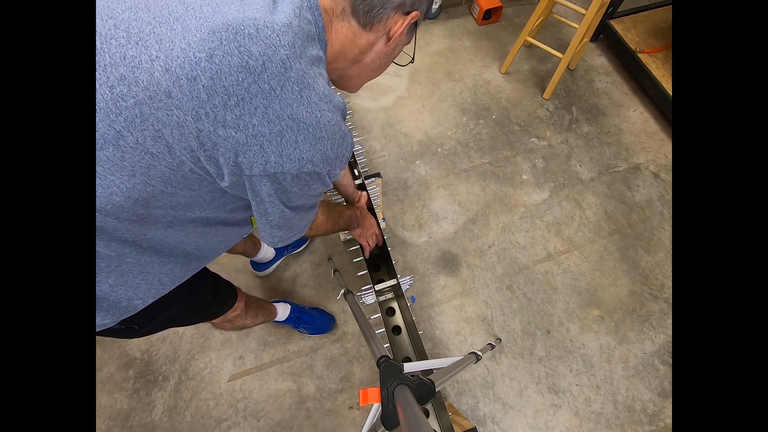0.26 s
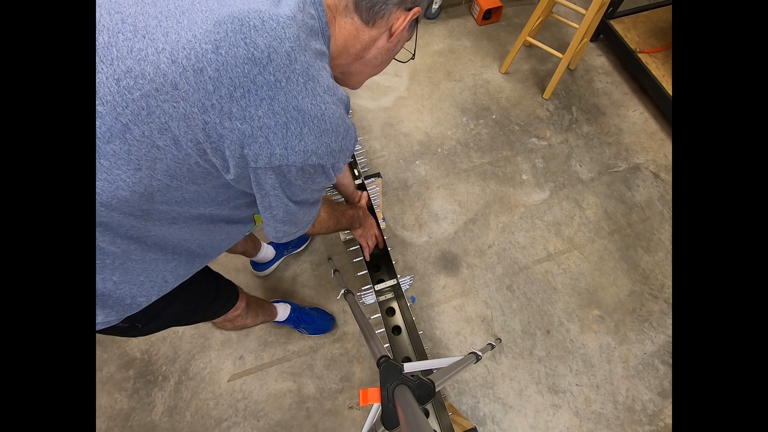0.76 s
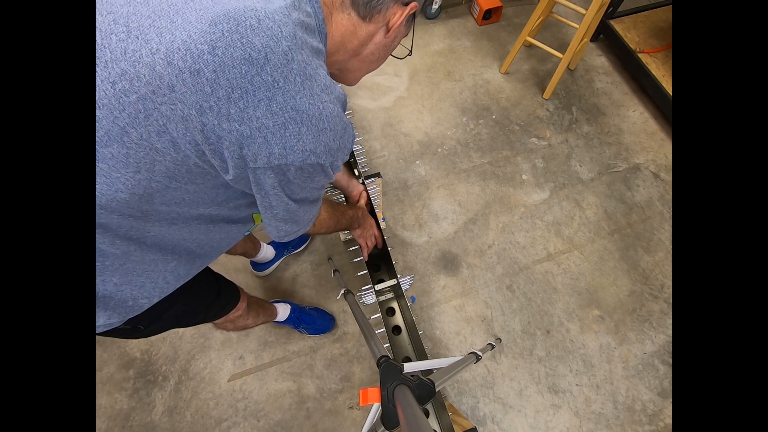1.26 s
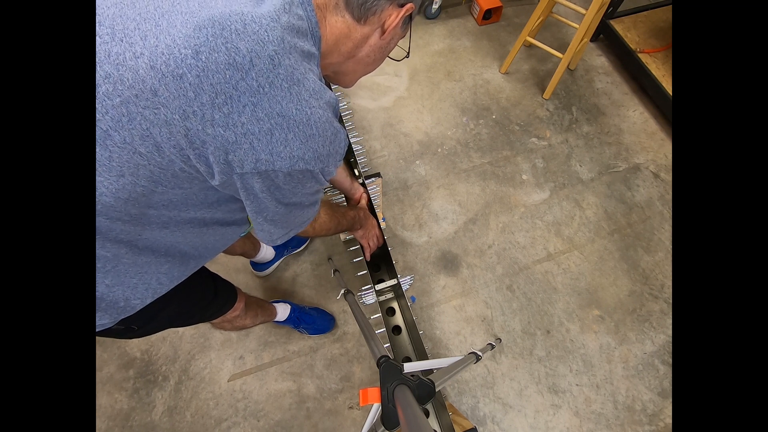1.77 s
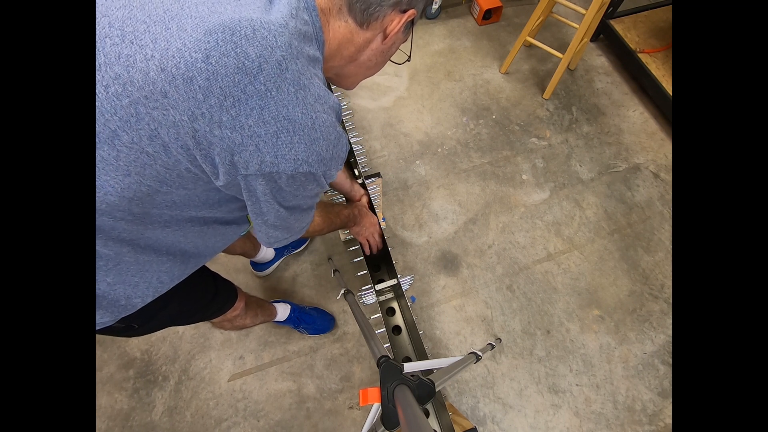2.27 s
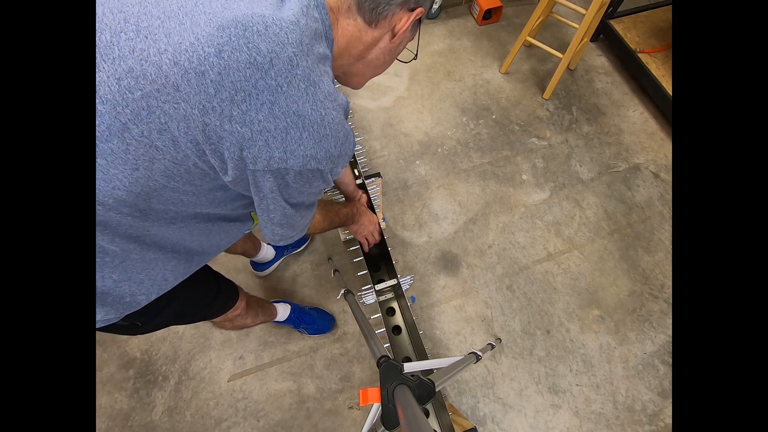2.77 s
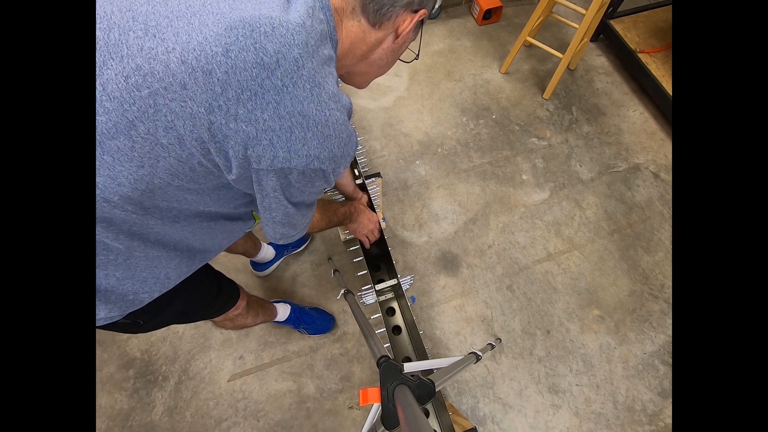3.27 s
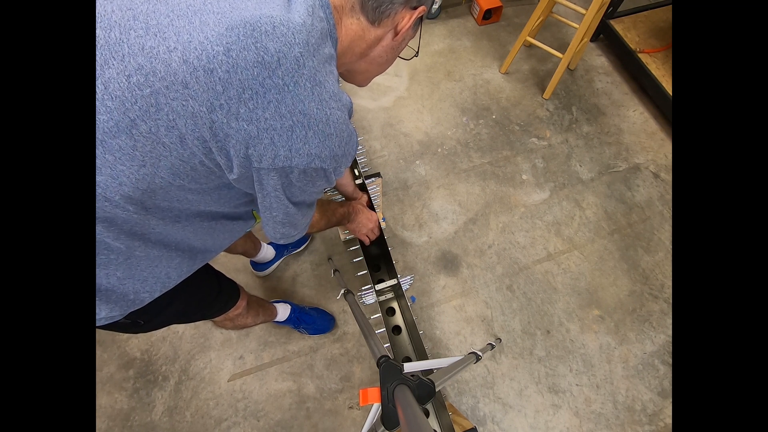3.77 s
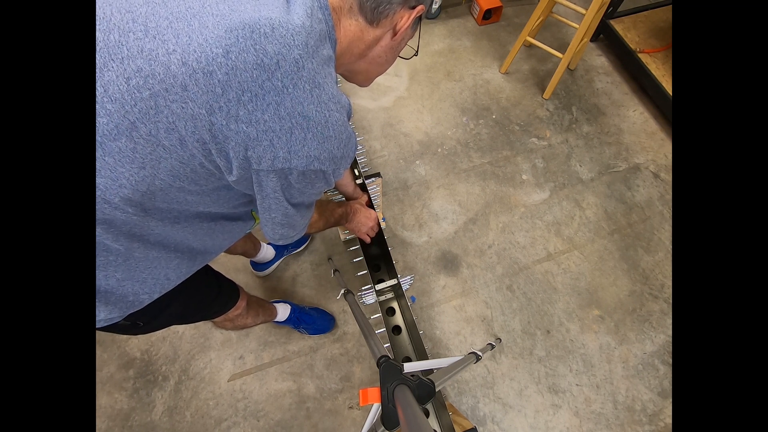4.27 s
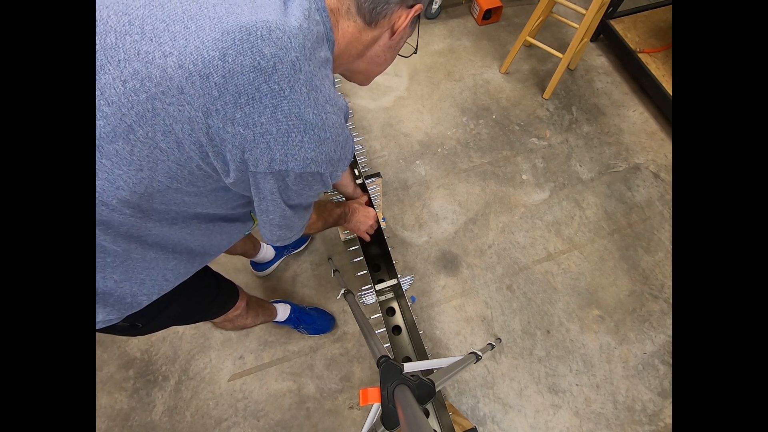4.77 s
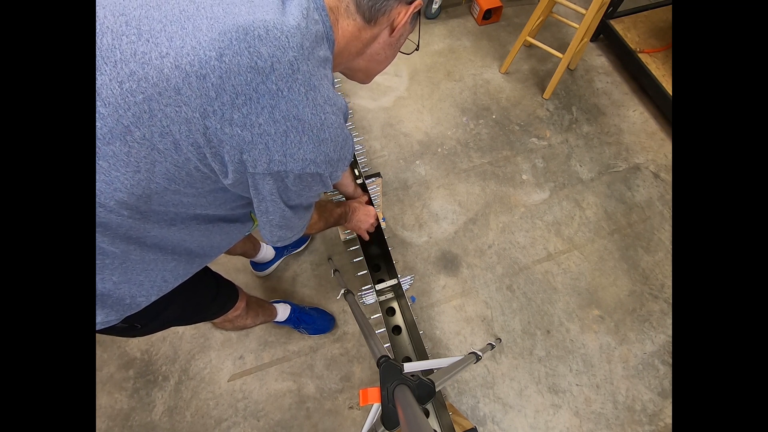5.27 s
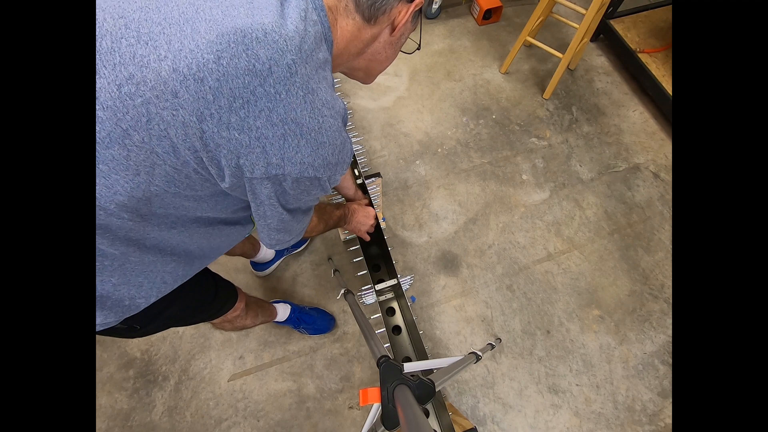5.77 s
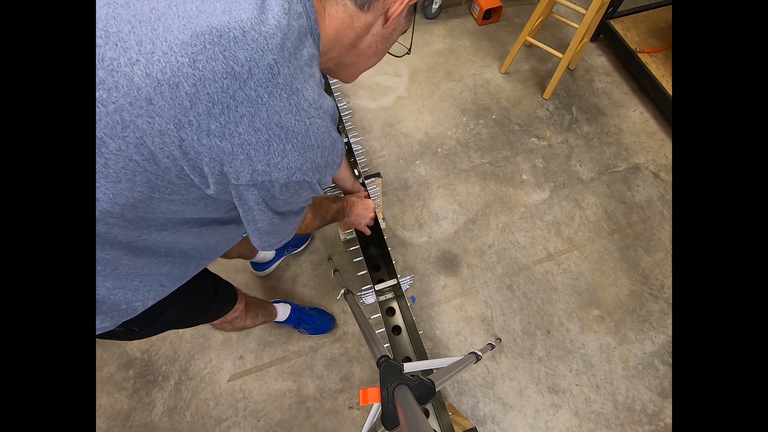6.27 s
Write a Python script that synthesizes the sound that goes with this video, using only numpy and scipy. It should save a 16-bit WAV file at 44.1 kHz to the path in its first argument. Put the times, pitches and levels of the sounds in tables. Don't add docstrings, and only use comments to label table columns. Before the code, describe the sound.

Close stereo pickup of rivets being set on a long metal beam in a reverberant concrete room. A soft fan noise runs throughout. Handles squeak before a bright crack; after a thin tick comes a softer, lower snap with a loose pin bouncing. Soft taps and sleeve rubs follow, then a very hard bang with deep rocking thuds, a tick and gentle rattling as the tool is handled again.

```python
import sys
import numpy as np
from scipy import signal
from scipy.fft import rfft, irfft, next_fast_len
from scipy.io import wavfile

SR = 44100
rng = np.random.default_rng(int(sys.argv[2]) if len(sys.argv) > 2 else 0)


def gain_from_db(level_db):
    decades = np.asarray(level_db, float) / 20
    return 10 ** decades


def wav_out(sig):
    wavfile.write(sys.argv[1], SR, np.round(np.clip(np.atleast_2d(sig).T, -1, 1) * 32767).astype(np.int16))


N = 287973
SIZE = next_fast_len(N + SR)
FREQS = np.maximum(np.fft.rfftfreq(SIZE, 1 / SR), 1)

# frequency_hz, density_db_per_hz
AIR_SPECTRUM = [(12, -45.5), (25, -24), (110, -32), (153, -10.5), (229, -14.5), (293, -32), (354, -8.5),
                (416, -17.5), (490, -16), (715, -13.5), (889, -18), (1570, -16.5), (2800, -24.5),
                (3500, -32), (6090, -36), (13000, -58)]
# frequency_hz, likeness (0 to 1)
AIR_ALIKE = [(60, 0.0978), (130, 0.28), (290, 0.74), (640, 0.096), (1410, 0.096), (3100, 0.64),
             (6820, 0.055), (15000, 0.026)]
# frequency_hz, balance_db
AIR_BALANCE = [(60, -4.5), (180, -0.5), (550, 0.5), (1650, 1.5), (4970, 2), (15000, -7.5)]
# pitch_hz, width_hz, level_db
FAN_HUM = [(238.3, 3.1, -68), (350, 11, -65.5), (471.7, 10, -81.5), (631, 11, -74.5), (735.4, 10, -73),
           (6060, 120, -91.5), (7730, 8, -103)]
AIR_DB = -60
WHINE_HZ, WHINE_DB, WHINE_WAVER_HZ = 9335, -95, 9
BELT_FIRST_S, BELT_LAP_S, BELT_S, BELT_HZ, BELT_WIDTH_HZ, BELT_DB = .25, .643, .04, 8870, 90, -92

# peak_s, level_db, build_s, ease_s
LEANS = [(0.039, -55, 0.03, .04), (.2, -64, 0.53, .15), (.6, -65, 0.22, 0.087), (1.099, -50, 0.053, 0.33),
         (1.34, -54.5, 0.13, 0.96), (1.745, -56, 0.091, 0.99), (1.98, -58.5, 0.34, 0.24),
         (2.48, -50.5, 0.17, 0.32), (2.8, -50.5, 1, 0.41), (3.07, -55, .04, 0.047), (3.2, -54, 0.18, 0.36),
         (3.351, -57, 0.068, .06), (3.48, -54.5, 0.046, 0.097), (3.76, -55, 0.05, 0.18),
         (3.93, -47.5, 0.18, 0.09), (4.311, -68, .08, 0.56), (4.66, -58, 0.039, 0.43),
         (5.3, -57.5, 0.68, 0.46), (5.42, -51.5, 0.34, 0.14), (5.53, -54.5, 0.072, .6),
         (6.05, -61.5, 0.41, 0.26), (6.232, -46.5, 0.084, 0.28), (6.45, -54.5, 0.55, 0.66)]
# start_s, length_s, level_db, swell_db_per_s
STROKES = [(1.044, 0.15, -64.5, 3), (1.214, 0.075, -68.5, -1), (1.3, .07, -63, 20), (1.87, .012, -67.5, -1),
           (2.202, 0.027, -71.5, 0), (2.247, 0.36, -72.5, 14), (2.78, 0.031, -70, 0),
           (3.07, 0.044, -79.5, -4.5), (3.74, 0.034, -82, -1.5), (3.856, .12, -77, -2),
           (5.5, 0.055, -75, 38), (5.554, .015, -57.5, 0), (5.93, .2, -76, 0), (6.01, .015, -73.5, 0),
           (6.156, 0.47, -64, 12.5)]
# frequency_hz, density_db_per_hz
FLEX_SPECTRUM = [(53, -74), (90, -44), (144, -10.5), (347, -3), (439, -10.5), (498, -9), (676, -16.5),
                 (1670, -22), (2500, -34.5), (3250, -55), (5500, -120)]
# frequency_hz, density_db_per_hz
RUB_SPECTRUM = [(900, -28.5), (1500, -6), (2750, 1.5), (4200, -3.5), (6000, -5.5), (9000, -11.5),
                (10800, -25.5), (12500, -48)]
# frequency_hz, density_db_per_hz
BRISK_RUB_SPECTRUM = [(5000, -33.5), (9000, 5), (11500, -10.5), (14000, -17), (15500, -39)]
SWING_DB, REST_FLEX_DB, REST_RUB_DB = 26.5, -69, -86.5
STROKE_RISE_DB_PER_S, STROKE_FALL_DB_PER_S = 400, 224

# pitch_hz, level_db, t60_s
PIN_MODES = [(4355, -2, .25), (4420, -1, .025), (6640, 1, .035), (7200, -14, .03)]
# start_s, level_db, hardness_db_per_octave
TINKLES = [
    (.715, -69, -25),
    (2.630, -42, -1),
    (2.644, -77, -10),
    (2.738, -78, -27),
    (2.764, -63.5, -9),
    (2.774, -57.5, 1),
    (2.782, -62, -4),
    (2.797, -64, -20),
]
PIN_RESTS = [
    .76,
    2.675,
    2.85,
]
PIN_CHOKE_DB_PER_S = 900

# frequency_hz, likeness (0 to 1)
ROOM_ALIKE = [(60, 0.92), (130, 0.99), (380, 0.99), (640, 0.3), (1410, 0.36), (3100, 0.64), (6820, 0.19),
              (15000, 0.16)]
# frequency_hz, t60_s
ROOM_T60 = [(60, 0.32), (160, 0.495), (420, 0.6), (1100, 0.44), (2910, 0.35), (7680, 0.3)]
ROOM_DB, ROOM_RISE_S = -21.5, 0.00096
BEAM_ROOM_DB = -16.5

# start_s, pitch_hz, level_db, t60_s
SQUEAKS = [(1.052, 4250, -65, 0.093), (1.085, 800, -51, .08), (1.097, 8650, -78, .1),
           (1.113, 4250, -68.5, .06), (1.126, 8620, -73, .3), (1.135, 7500, -76.5, .1),
           (1.14, 4180, -71, .2), (1.183, 4180, -69.5, .08), (1.2, 3100, -68, .06), (1.2, 6060, -76, .2),
           (1.09, 300, -46, .1)]
# start_s, pitch_hz, level_db, t60_s
BEAM_MODES = [(1.357, 4230, -26, 0.066), (1.356, 3040, -23.5, 0.08), (1.3553, 5100, -24, 0.044),
              (1.3554, 8400, -32.5, .012), (1.358, 1230, -33.5, 0.24), (1.371, 165, -30.5, 0.29),
              (1.375, 305, -21, 0.025), (1.879, 7150, -68, 0.033), (1.879, 6050, -71, 0.09),
              (1.9, 5990, -77, 0.2), (2.542, 822, -31.5, 0.11), (2.545, 1730, -32, 0.14),
              (2.544, 2730, -33.5, 0.036), (2.544, 3046, -35, 0.086), (2.545, 3280, -45, 0.096),
              (2.546, 335, -33, 0.2), (2.548, 350, -27.5, 0.055), (2.553, 6040, -34, .02),
              (2.4, 151, -55, 0.22), (2.69, 149, -48.5, 0.22), (2.801, 185, -51, .2),
              (2.921, 190, -55, 0.22), (3.9, 325.5, -46.5, 1), (3.855, 320, -40, .12), (3.91, 307, -51, .2),
              (3.938, 480, -44, 0.058), (5.5415, 820, -40, 0.074), (5.542, 8300, -49.5, .004),
              (5.5424, 10300, -54.5, 0.0065), (5.5526, 709, -26, 0.1), (5.5526, 950, -34, 0.055),
              (5.5527, 7940, -42.5, .004), (5.5545, 9900, -45, .008), (5.5637, 8500, -15, .003),
              (5.5643, 9800, -27, .004), (5.5635, 800, -4.5, 0.02), (5.565, 530, -6.5, 0.028),
              (5.565, 812, -22, 0.087), (5.564, 1500, -17.5, 0.023), (5.570, 342, -12.5, 0.14),
              (5.569, 206, -12.5, 0.083), (5.576, 178, -17, .05), (5.579, 132.6, -26.5, 0.34),
              (5.589, 146.5, -28, .28), (5.572, 166, -32, 0.26),
              (5.83, 164, -44, 0.13), (6.01, 124, -48, .1), (6.04, 188, -49.5, .15), (6.09, 137, -54.5, 0.13),
            (6.135, 180, -51, .12), (6.179, 1300, -61.5, 0.089), (6.177, 809, -49.5, 0.33),
            (6.34, 170, -48, 0.087), (6.18, 520, -56, .06), (6.26, 1250, -55, .08), (5.74, 575, -30, 0.095),
            (6.212, 164, -37, 0.12), (6.222, 213, -36, 0.11), (6.244, 225, -38.5, .1),
            (6.225, 1000, -61, .1), (6.39, 335, -43.5, 0.2), (6.401, 6300, -63, .15)]

# start_s, level_db,
# hardness_db_per_octave, part_hz, part_db
KNOCKS = [(1.08, -46, 4.5, 770, 7), (1.365, -20, 7, 3300, -0.5), (1.746, -62, 14, 6000, -2.5),
          (2.551, -23, 2.5, 5800, 11), (2.838, -46, 3, 1500, 1.5), (3.346, -48, -1, 350, 13),
          (3.453, -47, 0, 880, 1.5), (3.736, -58.5, 7.5, 8000, 5.5), (3.853, -42, -1, 883, 1),
          (3.909, -42, -1.5, 513, 7), (3.94, -51, -2.5, 500, -3), (5.54, -36.5, 1, 794, 15.5),
          (5.5527, -38, 12, 800, 13.5), (5.593, -12, -0.5, 950, 12), (6.021, -61, 11, 6040, 13.5),
          (6.177, -38.5, 3, 1130, 9), (6.215, -50, -6.5, 200, 8)]
# frequency_hz, density_db_per_hz
KNOCK_COLOUR = [(60, -54.5), (105, -31.5), (140, -4), (320, -4), (900, -8), (3000, -22.5), (10000, -50),
                (12000, -62), (16000, -84.5)]
RATTLE_S, RATTLE_HALVES_DB, STRONG_HALVES_DB, RATTLE_MAX_S = 0.0047, 4.5, 14, .03
# pitch_hz, level_db, t60_s
BODY_MODES = [(330.4, 0, 0.27), (456, -2, 0.29), (507, -1.5, 0.33), (569, 0.5, 0.564), (722, -9.5, .3),
              (789, 0.5, 0.19), (833, 0, .36), (881, -4, 0.55), (1014, -10.5, .4), (1474, -6, .35),
              (1730, -6.5, 0.44), (1812, -5.5, 0.21), (2167, -8.5, 0.304), (2710, -11, .25)]
BODY_DB = -41.5

SNAP_TIMES = [
    1.3552,
    2.5398,
    5.5632,
    1.8785,
    5.8503,
]
# level_db, balance_db, rattle_s, tail_db, tail_length_factor
SNAPS = [
    (-8.5, -0.5, 0.004, 3.5, 0.97),
    (-22.5, -1, 0.0052, 6.5, 0.93),
    (-0.5, -1.5, 0.0025, -3, 1.22),
    (-39.5, -2, 0.004, -7, 0.77),
    (-34.5, -1.5, 0.0067, 0.5, 0.76),
]
# frequency_hz, density_db_per_hz
SNAP_COLOURS = [
    [(40, -45.5), (70, -14), (100, -31.5), (135, -7), (370, -6.5), (620, -15), (850, -10.5), (1500, -7.5),
     (3000, -6), (5900, -9.5), (8000, -19), (10000, -31), (11000, -51.5), (14300, -56.5), (16000, -78)],
    [(65, -44), (115, -41), (160, -10), (260, -12), (340, -0.5), (650, -18), (800, -10), (1700, -6.5),
     (3350, -13), (3900, -25), (4700, -19), (7400, -22), (10200, -32.5), (11200, -66), (14000, -44),
     (15500, -90)],
    [(30, -48), (62, -33.5), (130, -7), (250, -22.5), (340, -8.5), (560, -17.5), (800, -8.5), (1500, -7.5),
     (2200, -14), (4000, -16), (10300, -27), (11300, -54), (13500, -43), (16000, -76)],
]
# frequency_hz, density_db_per_hz
TICK_COLOURS = [
    [(500, -49), (1900, -2), (2900, 5), (3500, -7.5), (4000, -6.5), (5000, -20), (6100, -16), (7200, -19),
     (9000, -36), (12000, -79.5)],
    [(500, -41), (1500, -8), (3000, -5.5), (4500, -8), (8000, -8.5), (10500, -15), (12000, -32.5),
     (15000, -33), (16500, -74)],
]
CRACK_LOW_HZ = 400
# start_s, pitch_hz,
# level_db, t60_s
MORE_MODES = [(1.356, 2250, -28, .12), (1.36, 1735, -35, .25), (1.357, 2850, -28, .2),
              (1.357, 3340, -31, .12), (1.356, 3693, -30, .2), (1.3555, 5730, -29, .15),
              (1.356, 5370, -33, .12), (1.36, 6363, -38, .2), (1.357, 1453, -38, .3),
              (1.365, 3500, -24, .012), (1.8785, 4000, -62, .03), (2.543, 1850, -35, .2),
              (2.542, 1400, -41, .2), (2.56, 436, -41, .3), (2.545, 2428, -43, .3), (2.57, 3413, -50, .2),
              (2.545, 4560, -48, .1), (2.6, 1050, -42, .1), (3.858, 880, -56, .6), (3.865, 1140, -57, .4),
              (3.86, 1750, -65, .4), (3.452, 880, -57, .1), (3.455, 400, -51, .15),
              (3.455, 1140, -60, .2), (3.885, 510, -52, .15), (3.96, 570, -54, .2),
              (5.565, 1200, -27, .06), (5.566, 700, -20, .25), (5.64, 680, -30, .4),
              (5.566, 2560, -26, .06), (5.566, 888, -27, .5), (5.567, 1026, -33, .5),
              (5.567, 1150, -34, .3), (5.567, 1281, -34, .3), (5.567, 1674, -28, .3),
              (5.567, 2175, -31, .4), (5.567, 3520, -35, .05), (5.851, 5000, -56, .08),
              (5.85, 900, -47, .03), (5.577, 330, -15, .03), (5.65, 786, -30, .18), (5.66, 1136, -32, .2),
              (6.18, 1150, -56, .3), (6.215, 810, -49, .25), (6.24, 2780, -63, .25),
              (6.41, 2870, -65, .2), (6.21, 1400, -58, .12), (6.2, 280, -50, .08), (6.41, 500, -53, .12)]

# start_s, level_db
THUDS = [
    (5.57, -31),
    (5.63, -32),
    (5.7, -44),
    (5.8, -44),
    (5.855, -53),
    (5.893, -51),
    (6.01, -57),
    (6.2, -60),
]
THUD_HZ, THUD_T60_S = 75.4, 0.089


def at_hz(points, hz):
    table = np.array(points)
    return np.interp(np.log(hz), np.log(table[:, 0]), table[:, 1])


def rms_one(x):
    return x / np.sqrt(np.mean(x ** 2) + 1e-20)


def pan(x, db):
    return x * gain_from_db(np.array([[db / 2], [-db / 2]]))


def add(out, x, s):
    i = round(s * SR)
    out[:, i:i + x.shape[-1]] += x[..., :N - i]


def highpass(x, order, hz):
    return signal.sosfilt(signal.butter(order, hz, "high", fs=SR, output="sos"), x)


def drift(rate):
    r = np.exp(-80 * np.pi * rate / SR)
    slow = signal.lfilter([1], [1, -2 * r, r * r], rng.standard_normal(N // 40 + 2002))[2000:]
    return np.interp(np.arange(N) / 40, np.arange(len(slow)), rms_one(slow))


def pair(alike, db):
    mid, side = rfft(rng.standard_normal((2, SIZE)))
    c = np.clip(at_hz(alike, FREQS), 0, 1)
    both = np.sqrt(1 + c) * mid + np.sqrt(1 - c) * side * [[1], [-1]]
    return rms_one(irfft(gain_from_db(db) * both, SIZE)[:, :N])


def ring(clicks, hz, t60):
    r, w = gain_from_db(-60 / (t60 * SR)), 2 * np.pi * hz / SR
    return signal.lfilter([0, np.sin(w)], [1, -2 * r * np.cos(w), r * r], clicks + 1e-18)


def resonance_db(hz, width):
    return -20 * np.log10(1 + ((FREQS - hz) / width) ** 2)


def ventilation():
    lean = at_hz(AIR_BALANCE, FREQS) / 2 * np.array([[1], [-1]])
    out = gain_from_db(AIR_DB) * pair(AIR_ALIKE, at_hz(AIR_SPECTRUM, FREQS) + lean)
    for hz, width, db in FAN_HUM:
        out = out + gain_from_db(db) * pair([(20, 1.0), (9000, 0.79)], resonance_db(hz, width))
    return out


def motor():
    t = np.arange(N) / SR
    phase = 2 * np.pi * np.cumsum(WHINE_HZ + WHINE_WAVER_HZ * drift(3)) / SR
    whine = gain_from_db(WHINE_DB + 1.5 * drift(4)) * np.sin(phase)
    lap = (t - BELT_FIRST_S + BELT_LAP_S / 2) % BELT_LAP_S - BELT_LAP_S / 2
    chirp = pair([(20, .8), (9000, .8)], resonance_db(BELT_HZ, BELT_WIDTH_HZ))
    return whine + gain_from_db(BELT_DB) * np.exp(-(lap / BELT_S) ** 2) * chirp


def strain():
    t = np.arange(N) / SR
    levels = [REST_FLEX_DB + 0 * t]
    for s, db, build, ease in LEANS:
        levels.append(db - SWING_DB * np.maximum((s - t) / build, (t - s) / ease))
    return np.max(levels, axis=0)


def sleeve():
    t = np.arange(N) / SR
    levels = [REST_RUB_DB + 0 * t]
    for s, length, db, swell in STROKES:
        rise = STROKE_RISE_DB_PER_S * np.maximum(s - t, 0)
        fall = STROKE_FALL_DB_PER_S * np.maximum(t - s - length, 0)
        levels.append(db + swell * np.clip(t - s, 0, length) - rise - fall)
    return np.max(levels, axis=0)


def handling():
    rub_db = sleeve()
    flex = gain_from_db(strain() + 0.85 * drift(12)) * pair(ROOM_ALIKE, at_hz(FLEX_SPECTRUM, FREQS))
    rub = gain_from_db(rub_db + 1.3 * drift(25)) * pair(ROOM_ALIKE, at_hz(RUB_SPECTRUM, FREQS))
    brisk_db = -69.5 + 4.0 * np.minimum(rub_db + 60.0, 2)
    return flex + rub + gain_from_db(brisk_db) * pair(ROOM_ALIKE, at_hz(BRISK_RUB_SPECTRUM, FREQS))


def pin():
    s, touch_db, tilt_db = np.transpose(TINKLES)
    rings, t = np.zeros(N), np.arange(N) / SR
    bout = np.searchsorted(PIN_RESTS, s)
    choke = gain_from_db(-PIN_CHOKE_DB_PER_S * np.maximum(t - np.c_[PIN_RESTS], 0))
    for hz, db, t60 in PIN_MODES:
        clicks = np.zeros(choke.shape)
        octaves = np.log2(hz / PIN_MODES[0][0])
        clicks[bout, np.round(s * SR).astype(int)] = gain_from_db(db + touch_db + tilt_db * octaves)
        rings += np.sum(choke * ring(clicks, hz, t60), axis=0)
    band = signal.butter(3, [3800, 7600], "band", fs=SR, output="sos")
    return pan(signal.sosfilt(band, rings), 0.1)


def room_bands():
    noise, t = rfft(pair(ROOM_ALIKE, 0)[:, :SR]), np.arange(SR) / SR
    octaves, bands = np.log2(np.maximum(np.arange(SR // 2 + 1), 1)), []
    for hz in 30 * 2 ** np.arange(0, 9.6, .5):
        share = np.clip(1 - 2 * np.abs(octaves - np.log2(hz)), 0, 1)
        swell = 1 - np.exp(-t / (ROOM_RISE_S + 1.5 / hz))
        bands.append((gain_from_db(ROOM_DB) * swell * irfft(noise * share, SR), at_hz(ROOM_T60, hz)))
    return bands


def workshop(x, bands, longer=1):
    t = np.arange(SR) / SR
    tail = sum(band * gain_from_db(-60 * t / (t60 * longer)) for band, t60 in bands)
    return signal.fftconvolve(x, tail, axes=1)


def beam():
    out, click = np.zeros((2, N)), np.r_[1, np.zeros(SR)]
    for s, hz, db, t60 in SQUEAKS + BEAM_MODES:
        side_db = rng.uniform(-1.1, 0.36) * np.clip((hz - 250) / 120, 0, 6)
        add(out, pan(gain_from_db(db) * ring(click, hz, t60), side_db), s)
    return highpass(out, 4, 125)


def blow(colour, rattle_s, tilt_db=0, part_hz=1000, part_db=0, size=8192):
    hz = np.maximum(np.fft.rfftfreq(size, 1 / SR), 1)
    part = part_db * np.exp(-(np.log2(hz / part_hz) / 0.24) ** 2)
    db = at_hz(colour, hz) + tilt_db * np.log2(hz / 1000) + part
    fold = np.r_[1, 2 * np.ones(size // 2 - 1), 1, np.zeros(size // 2 - 1)]
    cepstrum = irfft(np.log(gain_from_db(db)), size) * fold
    click = irfft(np.exp(rfft(cepstrum)), size)
    span = max(rattle_s, .0005) * SR
    click = click * np.sqrt((span / 2 + 20) / np.sum(click ** 2)) / 3
    clicks = rng.standard_normal((2, size)) * np.sqrt(rng.exponential(1, size))
    clicks[0, 0] = 1.3
    clicks = clicks * np.exp(-np.arange(size) / span)
    mid, side = rfft(clicks) / np.sqrt(np.sum(clicks[0] ** 2))
    side = 0.26 * side * hz ** 2 / (hz ** 2 + 600 ** 2)
    near = irfft((mid + side * [[1], [-1]]) * rfft(click), size)
    return near, click


def knocks():
    close, feed = np.zeros((2, 2, N))
    for s, db, tilt_db, part_hz, part_db in KNOCKS:
        strong = max(db + 42, 0) / STRONG_HALVES_DB
        rattle_s = min(RATTLE_S * 2 ** (-tilt_db / RATTLE_HALVES_DB - strong), RATTLE_MAX_S)
        near, whole = blow(KNOCK_COLOUR, rattle_s, tilt_db, part_hz, part_db)
        add(close, gain_from_db(db) * near, s)
        add(feed, gain_from_db(db + 3.0) * whole, s)
    return close, feed


def body(push):
    out = np.zeros((2, N))
    for k, (hz, db, t60) in enumerate(BODY_MODES):
        out += pan(gain_from_db(BODY_DB + db) * ring(push[0], hz, t60), 3.0 * (-1) ** k - 1.5)
    return out


def snaps(bands):
    out, push = np.zeros((2, 2, N))
    for s, snap, colour in zip(SNAP_TIMES, SNAPS, SNAP_COLOURS + TICK_COLOURS):
        db, pan_db, rattle_s, tail_db, longer = snap
        near, whole = blow(colour, rattle_s)
        add(out, pan(gain_from_db(db) * highpass(near, 2, CRACK_LOW_HZ), pan_db), s)
        add(out, workshop(pan(gain_from_db(db + tail_db) * whole, pan_db), bands, longer), s)
        add(push, gain_from_db(db) * whole, s)
    return out, push


def more_modes():
    out, click = np.zeros((2, N)), np.r_[1, np.zeros(SR // 2)]
    for k, (s, hz, db, t60) in enumerate(MORE_MODES):
        side_db = (4.0 * (-1) ** k - 2.5) * np.clip((hz - 300) / 500, 0, 1)
        add(out, pan(gain_from_db(db) * ring(click, hz, t60), side_db), s)
    return highpass(out, 4, 150)


def stand():
    pushes = np.zeros(N)
    for s, db in THUDS:
        pushes[round(s * SR)] = gain_from_db(db)
    band = signal.butter(2, [55, 120], "band", fs=SR, output="sos")
    return pan(signal.sosfilt(band, ring(pushes, THUD_HZ, THUD_T60_S)), -0.3)


def scene():
    bands = room_bands()
    close, feed = knocks()
    swing, tinkle = beam() + more_modes(), pin()
    room = workshop(feed + gain_from_db(BEAM_ROOM_DB) * swing + tinkle / 24, bands)[:, :N]
    cracks, push = snaps(bands)
    blows = cracks + close + body(push + feed) + swing + tinkle + stand() + room
    return blows + handling() + ventilation() + motor()


def top_cut(x):
    return signal.sosfilt(signal.butter(12, 16510, fs=SR, output="sos"), x)


def record(dry):
    t = np.arange(N) / SR
    over_db = np.maximum(20 * np.log10(np.abs(dry).max(axis=0) + 1e-9) + 30, 0) * 0.15
    release = 2.83 * t
    duck_db = np.maximum.accumulate(over_db + release) - release
    r = np.exp(-1 / (0.0082 * SR))
    duck_db = signal.lfilter([1 - r], [1, -r], duck_db)
    level = 1.324 * np.tanh(dry * gain_from_db(-duck_db) / 1.262)
    level = signal.sosfilt(signal.butter(8, 15000, fs=SR, output="sos"), level)
    return top_cut(level)


dry = scene()
out = record(dry)
wav_out(out)
```